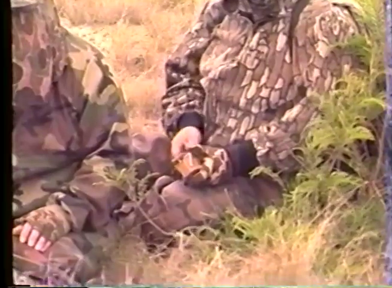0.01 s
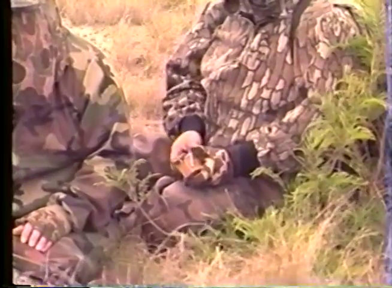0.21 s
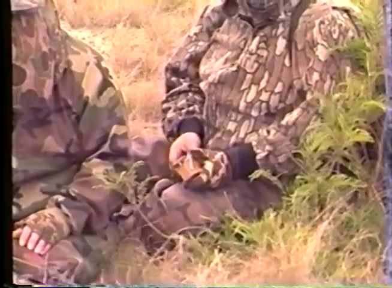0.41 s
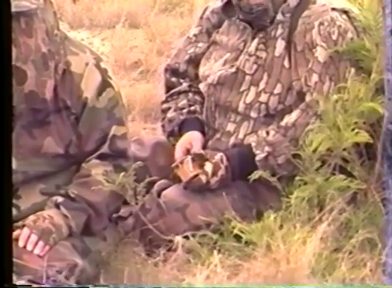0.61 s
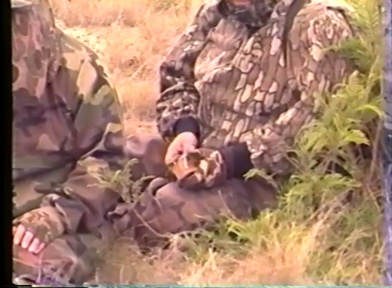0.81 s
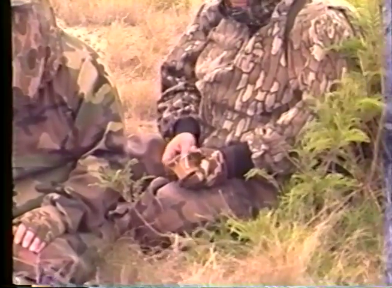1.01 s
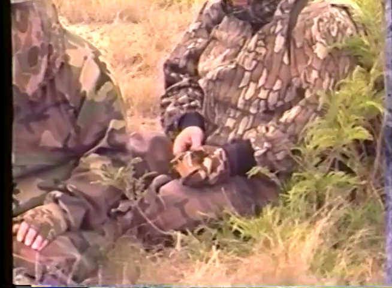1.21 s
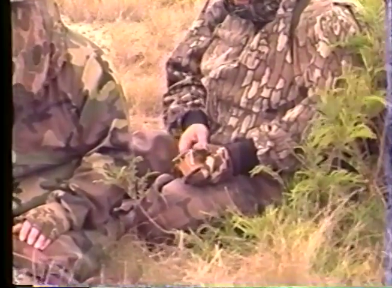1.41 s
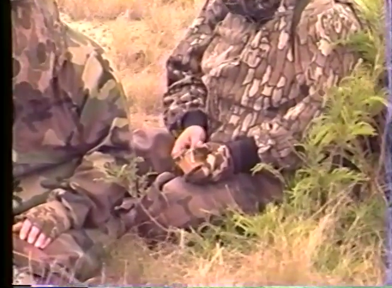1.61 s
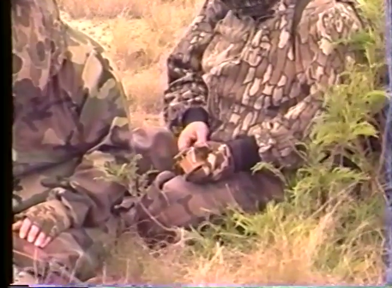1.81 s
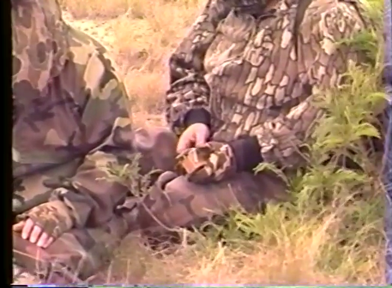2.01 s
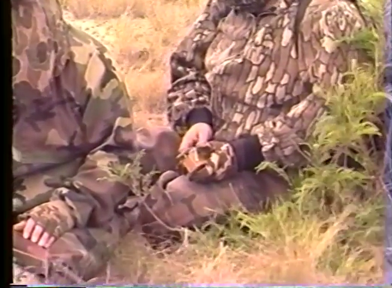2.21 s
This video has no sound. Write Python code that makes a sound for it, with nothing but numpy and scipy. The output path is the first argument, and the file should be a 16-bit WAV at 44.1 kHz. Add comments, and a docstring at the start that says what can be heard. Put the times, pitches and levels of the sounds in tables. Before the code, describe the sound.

In open grassland, a nearby wooden box turkey call yelps six times in a steady run, each squeal dropping into a brief rattle. Soft hiss and hum lie underneath, and a faint gust touches the microphone at the end.

```python
"""Open grassland hisses over a low hum and a thin whine; then a wooden box turkey call yelps six times.
The lid taps the box, sticks and slips on its wall in a falling squeal, and chatters to a stop.
Now and then it brushes back. A faint chirp slips in midway, and a low gust swells at the end.
A limiter ducks the hiss with each yelp and lets it back up slowly."""
import sys
import numpy as np
from scipy import signal
from scipy.fft import rfft, irfft
from scipy.io import wavfile
from scipy.ndimage import uniform_filter1d, minimum_filter1d

SR = 44100
rng = np.random.default_rng(int(sys.argv[2]) if len(sys.argv) > 2 else 0)


def unload_audio(sound):
    """Save the sound as a 16-bit wav file, at the path given as the first command line argument."""
    columns = np.transpose(np.atleast_2d(sound))
    # keep every value between -1 and 1, then stretch to whole-number steps
    steps = np.round(np.clip(columns, -1, 1) * 32767)
    wavfile.write(sys.argv[1], SR, steps.astype(np.int16))


N = 101430
T = np.arange(N) / SR

# Table levels are relative: gains and the limiter follow.
# air of the open field (f/Hz, level/dB)
HISS_SPECTRUM = [(88, -40), (150, 5), (286, -4.5), (601, -7), (649, -5.5), (960, -7.5), (1190, -12.5),
                 (1260, -14.5), (2400, -14.5), (4000, -20), (4950, -15.5), (16000, -22.5)]
# wind on the microphone (f/Hz, level/dB)
WIND_SPECTRUM = [(15, -25), (40, -7.5), (80, -3), (150, -31), (300, -30), (900, -49.5)]
# swell of that wind (t/s, level/dB)
WIND_ENVELOPE = [(0, -49), (1.85, -62), (2.03, -46), (2.17, -40.5), (2.3, -43.5)]
# partials of the hum (f/Hz, level/dB)
HUM_PARTIALS = [(30, -63), (59.9, -56), (90, -61.5), (120, -65.5), (150, -68), (180, -86.5), (240, -70.5)]
# bass-heavy noise floor (f/Hz, level/dB)
FLOOR_SPECTRUM = [(20, 36.5), (70, 20.5), (200, -11), (600, -4.5), (3000, -14), (16000, -44)]
# noise in opposite phase at the two ears (f/Hz, level/dB)
SIDE_SPECTRUM = [(20, 13.5), (80, 3), (250, -12), (1000, -21), (3000, -44), (16000, -30.5)]
# the lid taps the box (t/s, click level/dB, click cutoff f/Hz, knock level/dB)
LID_TAPS = [(.1808, -28, 1200, -25), (.5152, -24, 1200, -20), (.809, -16, 1800, -20),
            (1.075, -12, 1600, -18), (1.6232, -13, 2000, -24), (1.722, -17, 2800, -25),
            (1.765, -52, 500, -29), (1.982, -20, 2000, -29)]
# resonances of the box (f/Hz, width/Hz, level/dB)
BOX_MODES = [(630, 127, -24), (842, 38.7, -11), (1326, 212, 2), (1580, 246, -3), (2040, 250, -6.5),
             (2427, 405, -13.5), (3272, 360, -18), (3594, 294, -11.5), (4054, 308, -6.5), (4840, 280, -20),
             (5766, 770, -19), (6264, 300, -19), (7246, 330, -22.5), (8550, 1600, -30), (10430, 730, -35.5)]
# low flutter that rides on loud sound (f/Hz, level/dB)
FLUTTER_SPECTRUM = [(20, -3), (80, -6.5), (200, -16.5), (500, -25), (1500, -34)]
# one curve per stroke of the lid (t/s, second harmonic f/Hz, its level/dB, overtone level/dB)
YELP_CURVES = [
    [(0.234, 1725, -33, -32), (0.242, 1810, -28.5, -51.5), (0.276, 1638, -28, -32),
     (0.29, 1565, -16.5, -38), (0.302, 1402, -19.5, -32), (0.322, 1340, -21, -34.5),
     (0.342, 1301, -24.5, -43.5), (0.36, 1288, -35, -60)],
    [(0.542, 1584, -27, -47), (0.546, 1595, -26, -37.5), (0.56, 1700, -28, -33.5),
     (0.576, 1572, -18.5, -30), (0.59, 1422, -20, -36), (0.61, 1296, -20.5, -27.5),
     (0.625, 1256, -28.5, -42.5)],
    [(0.812, 1735, -25.5, -34.5), (0.828, 1591, -21, -32), (0.846, 1645, -20, -28.5),
     (0.86, 1553, -15.5, -27), (0.882, 1306, -19, -30), (0.896, 1263, -24, -28.5)],
    [(1.079, 1794, -30, -53), (1.093, 1583, -18.5, -26.5), (1.101, 1693, -18.5, -29),
     (1.115, 1597, -23, -26), (1.129, 1531, -14, -28.5), (1.147, 1330, -21, -26.5),
     (1.155, 1295, -18, -28.5)],
    [(1.367, 1732, -20, -20), (1.375, 1564, -15, -35), (1.387, 1611, -18.5, -22.5),
     (1.395, 1494, -15.5, -27), (1.407, 1345, -19, -27.5), (1.416, 1283, -21.5, -28.5)],
    [(1.626, 1605, -23, -39), (1.636, 1652, -28, -28.5), (1.65, 1563, -19.5, -35.5),
     (1.678, 1330, -24, -30.5), (1.688, 1287, -19.5, -33)],
]
# chatter as a stroke runs out (t/s, length/s, ring f/Hz, ring level/dB, rattle level/dB)
LID_CHATTERS = [(0.341, 0.016, 912, -27.5, -28.5), (.621, 0.02, 885, -16.5, -18.5),
                (0.893, 0.029, 880, -13.5, -17.5), (1.151, 0.023, 893, -13.5, -13.5),
                (1.413, 0.03, 920, -12.5, -17.5), (1.685, .028, 870, -14.5, -16.5)]
# the lid brushes back (t/s, length/s, level/dB)
LID_BRUSHES = [(.712, .015, -37), (1.258, .072, -23), (1.804, .05, -31.5), (1.982, .028, -39)]
# resonances of the lightly brushed lid (f/Hz, width/Hz, level/dB)
LID_MODES = [(980, 80, -22), (1420, 210, -1), (2400, 1400, -24), (3950, 600, -20), (5600, 380, -20),
             (6200, 220, -19), (7350, 380, -24), (8700, 900, -22), (11500, 1300, -34)]


def amp(db):
    """Decibels to gain."""
    return 10 ** (np.asarray(db) / 20)


def unit(x):
    """Scales to rms 1."""
    return x / np.sqrt(np.mean(x ** 2) + 1e-20)


def add(mix, start, sound):
    """Drops a sound into the mix at a time in seconds."""
    part = mix[max(round(start * SR), 0):][:len(sound)]
    part += sound[:len(part)]


def noise(spectrum):
    """Noise at rms 1, coloured by a spectrum."""
    hz, db = np.transpose(spectrum)
    f = np.fft.rfftfreq(N, 1 / SR)
    colour = amp(np.interp(np.log(f + 1), np.log(hz), db))
    return unit(irfft(rfft(rng.standard_normal(N)) * colour, N))


def wobble(hz, count):
    """Smooth random modulation that rolls off above a rate."""
    f = np.fft.rfftfreq(N, 1 / SR)
    return unit(irfft(rfft(rng.standard_normal(N)) * np.exp(-(f / hz) ** 2), N))[:count]


def power(x, size):
    """Envelope follower: mean square over a window of samples."""
    return abs(uniform_filter1d(x ** 2, size)) + 1e-12


def wood_response(modes, size=4096, edge_hz=11500):
    """Impulse response of wood with steep resonances; it radiates little above the edge."""
    f = abs(np.fft.fftfreq(size, 1 / SR))
    peaks = sum(amp(db) ** 2 / (1 + 4 * ((f - hz) / width) ** 2) ** 2 for hz, width, db in modes)
    log_gain = np.log(peaks / (1 + (f / edge_hz) ** 20)) / 2
    minimum_phase = np.exp(np.conj(signal.hilbert(log_gain)))
    impulse = np.fft.ifft(minimum_phase).real[:size // 2]
    return impulse / np.linalg.norm(impulse)


def excite(force, body):
    """Rings a body with a force."""
    return signal.fftconvolve(force, body)[:len(force)]


def field():
    """The bed: gently wavering hiss of the open field and a low gust on the microphone."""
    hiss = amp(-48 - 3 * wobble(5.1, N)) * noise(HISS_SPECTRUM)
    gust = amp(np.interp(T, *np.transpose(WIND_ENVELOPE))) * noise(WIND_SPECTRUM)
    return hiss + gust


def hum():
    """A steady low drone of sines in random phase."""
    return sum(amp(db) * np.sqrt(2) * np.sin(2 * np.pi * (hz * T + rng.random()))
               for hz, db in HUM_PARTIALS)


def whine(hz=15730, width_hz=40, db=-69.5):
    """A thin, flickering tone at the top of hearing."""
    return amp(db) * unit(np.sin(2 * np.pi * hz * T) * (1 + wobble(width_hz, N)))


def tap(start, click_db, cutoff_hz, knock_db, box):
    """A soft blow of the lid on the box: a dull click and the short low knock of the wall."""
    knock_hz, t60_s, rise_s = 913, .029, .00022
    t = np.arange(len(box)) / SR
    click = signal.sosfilt(signal.butter(2, cutoff_hz, fs=SR, output="sos"), box)
    knock = np.sin(2 * np.pi * knock_hz * t) * amp(-60 * t / t60_s) * (1 - np.exp(-t / rise_s))
    return start, amp(click_db) * click / abs(click).max() + amp(knock_db) * knock


def raspy_overtones(hz, cycles, box):
    """Uneven slips and bright friction noise ring the box, levelled to a steady rms of 1."""
    n, rasp_hz, rasp_db = len(hz), 2790, -16
    tilt_db_per_khz = 5.5 * np.log2(hz / 790)  # the treble dulls as the pitch falls
    uneven = cycles + .0054 * wobble(400, n)
    slips = unit(sum(amp(tilt_db_per_khz * k * hz / 1000) * np.cos(2 * np.pi * k * uneven)
                     for k in range(3, 21)))
    rasp = signal.sosfilt(signal.butter(2, rasp_hz, "high", fs=SR, output="sos"), rng.standard_normal(n))
    rasp *= amp(rasp_db + tilt_db_per_khz * 2 * rasp_hz / 1000)
    shimmer = 1 + .12 * wobble(600, n)
    overtones = excite(slips * shimmer + rasp, box)
    return overtones / np.sqrt(power(overtones, size=300))


def yelp(curve, box):
    """The lid scrapes, catches, then sticks and slips: a clean second harmonic leads, edged with rasp."""
    attack_s, release_s, bloom_s = .005, .0047, .014
    catch_s, waver_s, scrape_s = .008, .038, .01
    times, second_hz, second_db, overtone_db = np.transpose(curve)
    t = np.arange(times[0] - attack_s, times[-1] + 2 * release_s, 1 / SR)
    age, n = t - t[0], len(t)
    # the pitch starts ragged and settles as the lid catches
    jitter = (.0025 + .018 * np.exp(-age / catch_s)) * wobble(500, n)
    waver = .018 * np.exp(-age / waver_s) * wobble(109, n)
    hz = np.interp(t, times, second_hz) / 2 * (1 + jitter + waver)
    cycles = np.cumsum(hz) / SR
    second_gain = amp(np.interp(t, times, second_db))
    overtone_gain = amp(np.interp(t, times, overtone_db))
    squeal = second_gain * np.sqrt(2) * np.sin(2 * np.pi * 2 * cycles)
    overtones = amp(3) * overtone_gain * np.minimum(age / bloom_s, 1) * raspy_overtones(hz, cycles, box)
    fundamental = unit(excite(np.sin(2 * np.pi * cycles), box))
    fundamental *= amp(-8) * np.sqrt(second_gain * overtone_gain)
    scrape = amp(-4) * second_gain * np.exp(-age / scrape_s) * unit(excite(rng.standard_normal(n), box))
    attack = np.minimum(age / attack_s, 1) ** 2
    release = np.exp(-2 * (np.maximum(t - times[-1], 0) / release_s) ** 2)
    return t[0], amp(13.5) * attack * release * (squeal + overtones + fundamental + scrape)


def chatter(start, length, ring_hz, ring_db, rattle_db, box):
    """The slowing lid slips only every few swings of the wall, which rings on at its lowest note."""
    scatter_s, rise_s, t60_s = .00015, .017, .046
    t = np.arange(0, length + .08, 1 / SR)
    swings = np.cumsum(rng.integers(1, 4, 40))
    slip_times = abs((swings - swings[0]) / ring_hz + scatter_s * rng.standard_normal(len(swings)))
    slips = np.zeros(len(t))
    slips[(slip_times[slip_times < length] * SR).astype(int)] = 1
    slips *= np.minimum(.65 + t / rise_s, 1)  # builds as the squeal breaks off
    wall = np.sin(2 * np.pi * ring_hz * t) * amp(-60 * t / t60_s)
    ring = amp(ring_db) * unit(excite(slips * amp(-10 * t / length), wall))
    rattle = amp(rattle_db) * unit(excite(slips * amp(-20 * t / length), box))
    return start, (ring + rattle) * np.sqrt(length / t[-1])


def brush(start, length, db, lid, grain_db=2, fade_db=-17):
    """Light grainy friction as the lid slides back."""
    t = np.arange(0, length + .012, 1 / SR)
    grains = rng.standard_normal(len(t)) * amp(grain_db * wobble(143, len(t)))
    force = grains * amp(fade_db * (t / length) ** 2) * (t < length)
    return start, amp(db) * unit(excite(force, lid))


def chirp(start, length, from_hz, to_hz, db):
    """A thin upward whistle, perhaps a small bird."""
    progress = np.arange(0, 1, 1 / (length * SR))
    hz = from_hz + (to_hz - from_hz) * progress
    return start, amp(db) * np.sin(np.pi * progress) * np.sin(2 * np.pi * np.cumsum(hz) / SR)


def limiter(x, threshold_db=-18.3, lookahead_s=.012, hold_s=.105, recover_s=.115):
    """Loud sound pulls the gain down; it holds there, then recovers slowly."""
    over_db = np.maximum(10 * np.log10(power(x.mean(0), size=200)) - threshold_db, 0)
    half = int((hold_s + lookahead_s) * SR) // 2
    origin = half - int(lookahead_s * SR)
    held_db = -minimum_filter1d(-over_db, 2 * half + 1, origin=origin, mode="constant")
    held_db[0] = 6  # opens ducked, so the bed swells in
    recovery = np.exp(-T / recover_s)
    duck_db = np.maximum.accumulate(held_db / recovery) * recovery
    return x / amp(uniform_filter1d(duck_db, size=200))


def scene():
    """The call and the chirp over the field bed, a hair left of centre."""
    box, lid = wood_response(BOX_MODES), wood_response(LID_MODES)
    mix = field()
    for curve in YELP_CURVES:
        add(mix, *yelp(curve, box))
    for row in LID_CHATTERS:
        add(mix, *chatter(*row, box))
    for row in LID_BRUSHES:
        add(mix, *brush(*row, lid))
    for row in LID_TAPS:
        add(mix, *tap(*row, box))
    add(mix, *chirp(start=1.032, length=.028, from_hz=3100, to_hz=4400, db=-47))
    return mix * amp([[.17], [-.17]])


def record(dry):
    """The output chain: limiter, then hum, whine, low flutter, faint noise and a steep treble cut."""
    limited = limiter(dry)
    tones = hum() + whine()
    flutter = amp(-25.5) * np.sqrt(power(limited.mean(0), size=600)) * noise(FLUTTER_SPECTRUM)
    floor = amp(-68) * noise(FLOOR_SPECTRUM)
    width = amp(-63.5) * noise(SIDE_SPECTRUM) * np.array([[1], [-1]])
    treble_cut = signal.firwin(511, cutoff=16050, window=("kaiser", 9), fs=SR)
    return signal.oaconvolve(limited + tones + flutter + floor + width, treble_cut[None], "same")


dry = scene()
out = record(dry)
unload_audio(out)
```